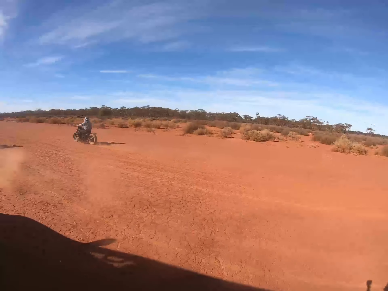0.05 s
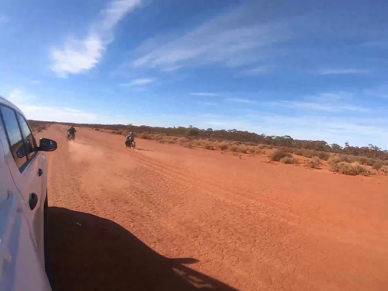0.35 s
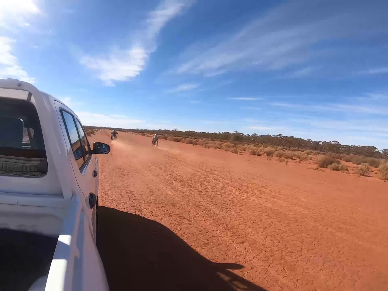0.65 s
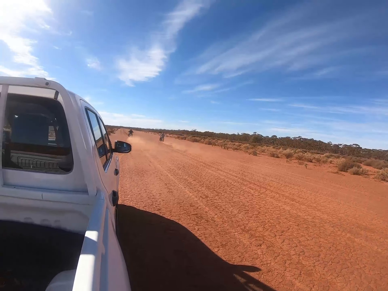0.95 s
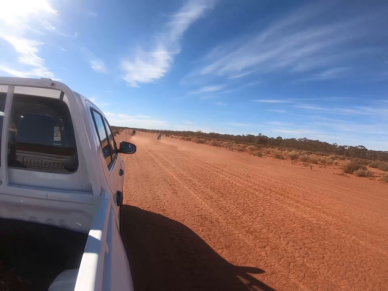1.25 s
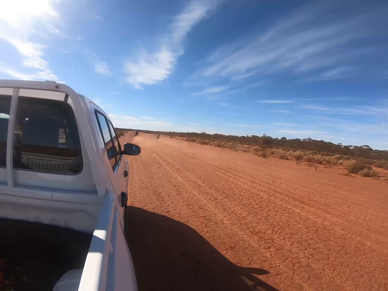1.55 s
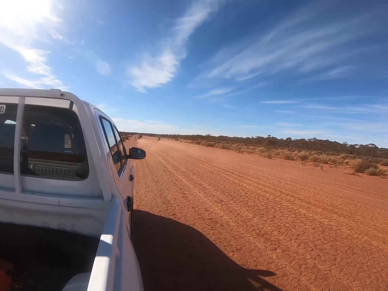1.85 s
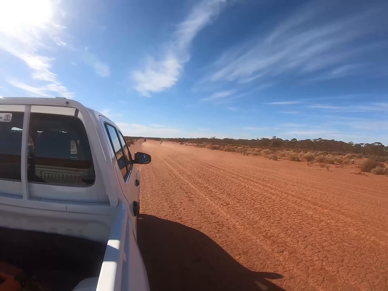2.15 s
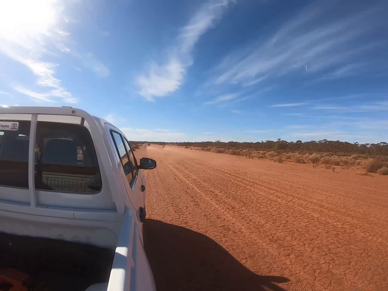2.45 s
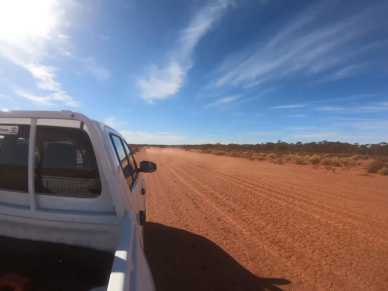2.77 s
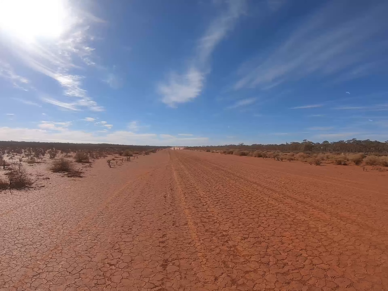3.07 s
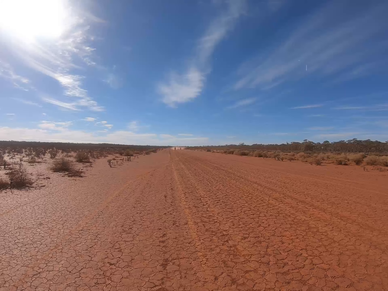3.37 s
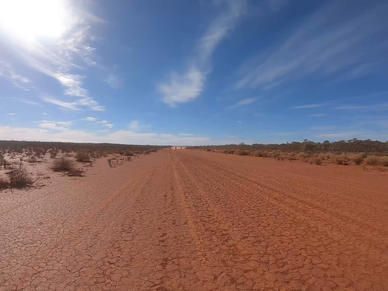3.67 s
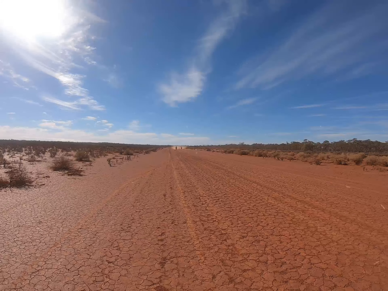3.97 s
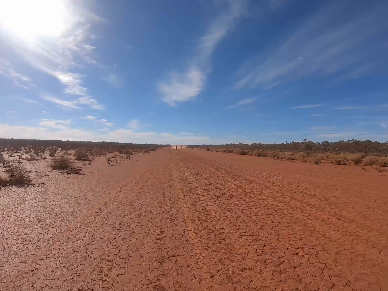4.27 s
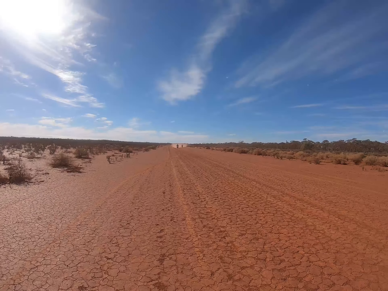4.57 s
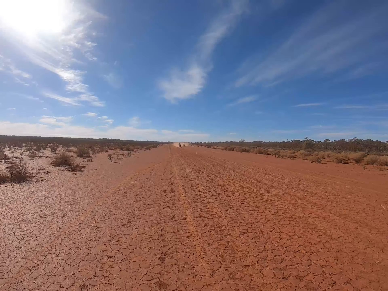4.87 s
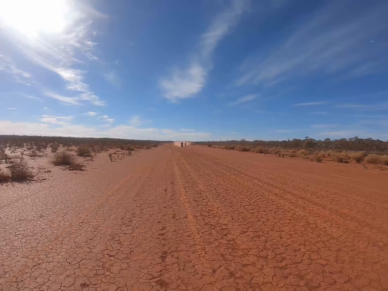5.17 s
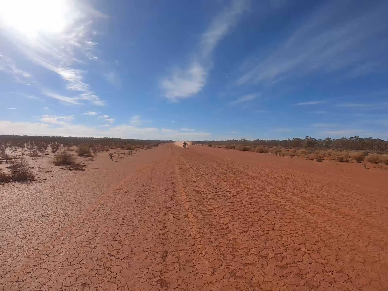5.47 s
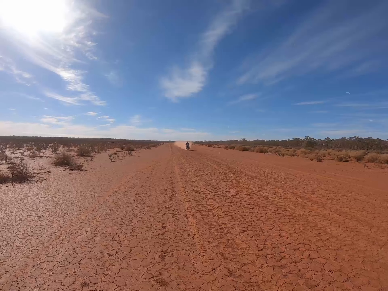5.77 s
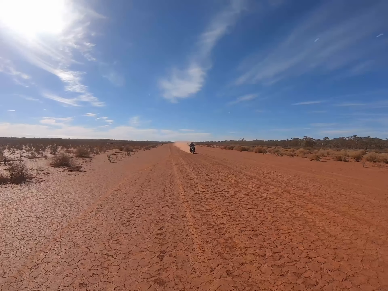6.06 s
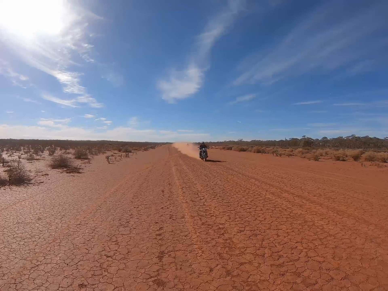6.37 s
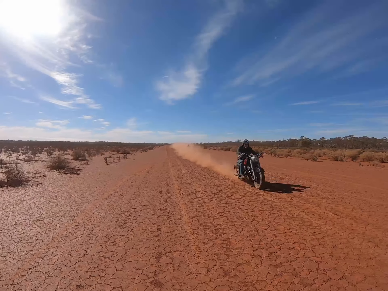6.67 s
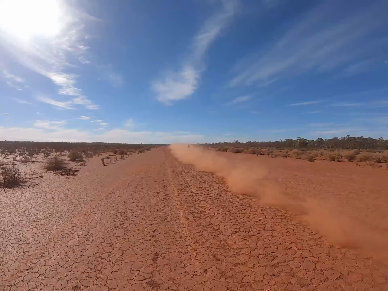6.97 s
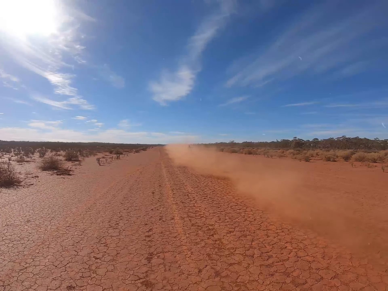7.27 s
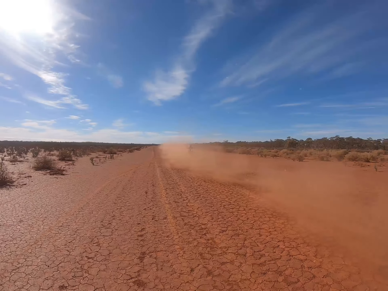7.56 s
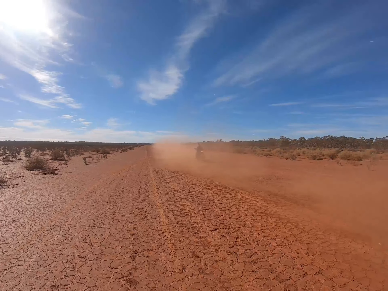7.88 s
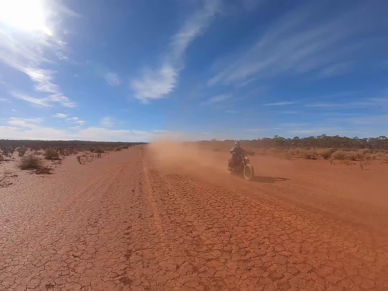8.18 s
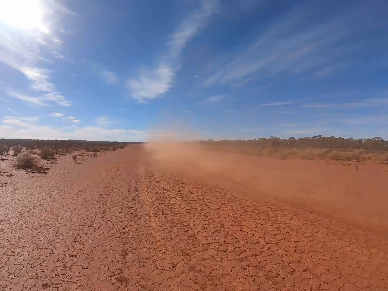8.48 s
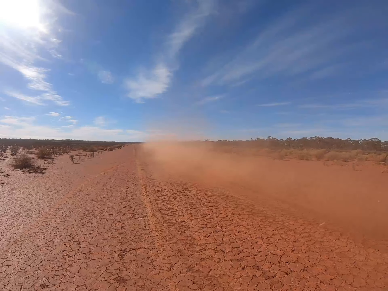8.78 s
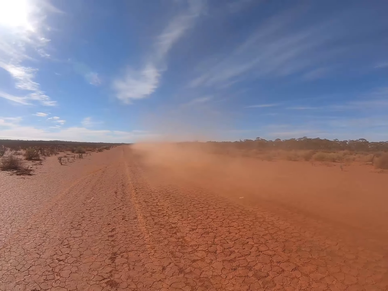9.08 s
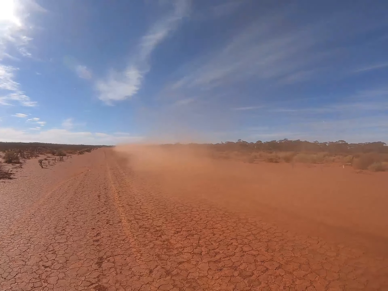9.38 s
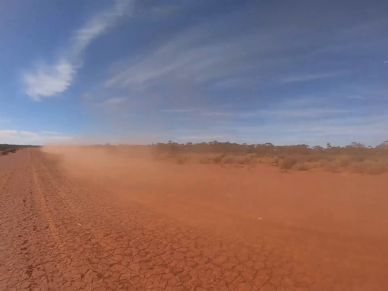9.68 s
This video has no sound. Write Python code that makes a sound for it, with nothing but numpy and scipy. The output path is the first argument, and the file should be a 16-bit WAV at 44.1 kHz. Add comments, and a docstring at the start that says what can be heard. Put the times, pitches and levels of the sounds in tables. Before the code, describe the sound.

Motorcycles drone away over open dirt, then two approach and thunder past one after the other, with light wind on the microphone.

```python
"""Two V-twin motorcycles on a dirt track

Open country, light wind on the microphone. Both machines ride away; the scene then switches: one
approaches, rolls off the throttle for a moment and passes, then the second passes on the right.
Each firing thumps through the exhaust and spits a burst of gas noise, over the hiss of tyres and
machinery. The passes reflect off the dirt and a parked truck."""
import sys
import numpy as np
from scipy import signal
from scipy.fft import rfft, irfft, next_fast_len
from scipy.io import wavfile
from scipy.ndimage import uniform_filter1d, map_coordinates

SR = 44100
rng = np.random.default_rng(int(sys.argv[2]) if len(sys.argv) > 2 else 0)


def unload_audio(sound):
    """Save the sound as a 16-bit wav file, at the path given as the first command line argument."""
    columns = np.transpose(np.atleast_2d(sound))
    # keep every value between -1 and 1, then stretch to whole-number steps
    steps = np.round(np.clip(columns, -1, 1) * 32767)
    wavfile.write(sys.argv[1], SR, steps.astype(np.int16))


N = 433503
TIME = np.arange(N) / SR
SWITCH_S = 3.07  # departure ends, approach begins
SOUND_M_S = 343
V_GAP_CYCLES = .4  # between the two firings

# First machine's rise and fall; rows thump, bark, rasp:
# (peak time [s], peak [dB], half-width [s], loss coming, loss going [dB per distance doubling])
FIRST_LEVEL = [(6.91, -12.5, 0.36, 7.36, 7.15), (6.815, -22, 0.38, 5.16, 13.1), (6.95, -26, 0.088, 3.49, 8)]


def amp(db):
    """Decibels to gain."""
    return 10 ** (np.asarray(db) / 20)


def unit(x):
    """Scale to rms 1."""
    return x / np.sqrt(np.mean(x ** 2) + 1e-20)


def along(points, hz):
    """Interpolate (frequency [Hz], value) points on a log axis."""
    knots_hz, values = np.transpose(points)
    return np.interp(np.log(hz + 1), np.log(knots_hz + 1), values)


def curves(rows, t=TIME):
    """Interpolate each column after the time column."""
    knots_s, *columns = np.transpose(rows)
    return [np.interp(t, knots_s, column) for column in columns]


def bumps(rows, t):
    """Summed bells (time [s], half-width [s], levels [dB] ...), one curve per level column."""
    return sum(np.outer(dbs, np.exp(-((t - at_s) / width_s) ** 2)) for at_s, width_s, *dbs in rows)


def wobble(rate_hz, t):
    """Smooth random curve, rate_hz knots a second."""
    coarse_s = t[::64]
    knots = rng.standard_normal(int(N * rate_hz / SR) + 4)
    return np.interp(t, coarse_s, map_coordinates(knots, [coarse_s * rate_hz]))


def filtered(x, response):
    """Apply a complex frequency response."""
    n = x.shape[-1]
    size = next_fast_len(n + 8192, True)
    return irfft(rfft(x, size) * response(np.fft.rfftfreq(size, 1 / SR)), size)[..., :n]


def band(x, low_hz, high_hz):
    """Steep causal band-pass."""
    return signal.sosfilt(signal.butter(4, [low_hz, high_hz], "band", fs=SR, output="sos"), x)


def low_share(hz, edge_hz):
    """Gain of a crossover's low side."""
    return 1 / (1 + (hz / edge_hz) ** 8)


def delayed(x, t, delay_s):
    """Varying delay on both channels."""
    return np.array([np.interp(t - delay_s, t, side) for side in x])


def two_ports(n, likeness=None):
    """White noise at both microphone ports, by default less alike in the treble."""
    # (frequency [Hz], left-right correlation)
    port_likeness = [(25, .96), (250, .99), (1000, .97), (4000, .86), (8000, .72), (12000, .5)]

    def mid_side_gains(hz):
        angle = np.arccos(np.clip(along(likeness or port_likeness, hz), -1, 1)) / 2
        return np.array([np.cos(angle), np.sin(angle)])

    mid, side = filtered(rng.standard_normal((2, n)), mid_side_gains)
    return np.array([mid + side, mid - side])


def blend(sounds, turn):
    """Cross-fade along a row of sounds (turn 0-1) at steady loudness."""
    place = turn * (len(sounds) - 1)
    mixed = sum(np.maximum(1 - np.abs(place - i), 0) * unit(x) for i, x in enumerate(sounds))
    power = np.atleast_2d(mixed ** 2).mean(0)
    return mixed / np.sqrt(np.abs(uniform_filter1d(power, size=9000)) + 1e-9)


def loudness_db(level, t):
    """Thump, bark and rasp fall with each doubling of distance; they swell and sag across the plain."""
    # (time [s], half-width [s], thump [dB], bark [dB], rasp [dB])
    swells = [(.93, 0.053, 1.5, -4, 2.5), (1.15, 0.075, -1.5, 4.5, -1), (1.65, 0.37, -0.5, 1.5, -2),
              (2.15, 0.23, 3.5, 4.5, 2), (2.97, 0.12, 4, 6.5, 2.5), (3.25, 0.17, 0.5, 2.5, -0.5),
              (4.35, 0.25, -3, 0, -3), (5.08, 0.37, 5.5, 7, 1.5), (5.46, 0.12, -7.5, -3.5, -0.5),
              (5.87, 0.4, 5.5, 5, 1), (8.85, .17, -3, 3.5, 1), (9.2, 0.21, -2.5, 0.5, 5)]
    rides_db = [db - np.where(t < at_s, coming, going) * np.log2(np.hypot(1, (t - at_s) / width_s))
                for at_s, db, width_s, coming, going in level]
    return np.array(rides_db) + bumps(swells, t)


def firings(cycle, gap_cycles, front_db, scatter_db, jitter_s=.00003):
    """Two unevenly spaced pulses a cycle, each slightly off in size and time."""
    pulses = np.zeros(len(cycle))
    for offset, db in [(-gap_cycles / 2, front_db), (gap_cycles / 2, 0)]:
        at = np.flatnonzero(np.diff(np.floor(cycle - offset)) > 0)
        lateness, size = np.clip(rng.standard_normal((400, 2))[:len(at)], -1.5, 1.5).T
        at = np.clip(at + np.round(jitter_s * SR * lateness).astype(int), 0, len(cycle) - 1)
        pulses[at] = amp(db + scatter_db * size)
    return pulses


def gas_flow(pulses, steady, burst_s, spit_db):
    """Noise envelope: a brief gas jet per firing, steady tyre and valve-gear hiss in between."""
    age_s = np.arange(SR // 40) / SR
    spits = pulses ** 2 * amp(spit_db * rng.uniform(-0.41, 1, len(pulses)))
    burst = np.exp(-age_s / burst_s) * (1 - np.exp(-age_s / 0.00064))
    jet = signal.fftconvolve(spits, burst)[:len(pulses)]
    return np.sqrt((1 - steady) * unit(jet) ** 2 + steady)


def patchy(x, depth_db):
    """Shifting resonances colour each spit of gas differently."""
    spectra = signal.stft(x, nperseg=512)[2]
    field = uniform_filter1d(rng.standard_normal(spectra.shape[1:]), size=4, axis=0)
    field = uniform_filter1d(field, size=14, axis=1)
    return signal.istft(spectra * amp(depth_db * unit(field)), nperseg=512)[1][:, :x.shape[1]]


def dispersed(x, pipe_hz=290, radius=0.98):
    """All-pass: waves run back and forth in the pipe, so a pulse leaves as a short ringing train."""
    poles = [1, -2 * radius * np.cos(2 * np.pi * pipe_hz / SR), radius ** 2]
    return signal.lfilter(poles[::-1], poles, x)


def pipe_ringing(x, colours, size=8192):
    """The exhaust rings after each pulse: one sound per colour and per angle halfway between."""
    hz = np.fft.rfftfreq(size, 1 / SR)
    db = np.repeat([along([*colour, (9000, -120)], hz) for colour in colours], 2, axis=0)
    cepstrum = irfft(np.log(amp((db[1:] + db[:-1]) / 2)))
    cepstrum[:, 1:size // 2] *= 2  # fold to minimum phase
    cepstrum[:, size // 2 + 1:] = 0
    impulses = irfft(np.exp(rfft(cepstrum)))
    return signal.oaconvolve(x[None], impulses, axes=1)[:, :len(x)]


def mouth_ring(pulses, mouth_hz=2950, log_spread=.14, decay_s=.003):
    """Each firing briefly rings the pipe mouth at a random pitch and strength."""
    age_s = np.arange(SR // 40) / SR
    ring = np.zeros(len(pulses) + SR)
    for at in np.flatnonzero(pulses):
        detune, size = rng.standard_normal(2)
        tone = np.sin(2 * np.pi * mouth_hz * np.exp(log_spread * detune) * age_s)
        ring[at:at + len(age_s)] += pulses[at] * size * np.exp(-age_s / decay_s) * tone
    return unit(band(ring[:len(pulses)], 1500, 6000))


def motorcycle(t, cycle, level, pose, gap_cycles, pipes, gas, front_db, scatter_db, burst_s, spit_db,
               thump_db, bark_db, rasp_db, ring_db, throttle=1, turbulence_db=-24, bark_noise=.1):
    """One V-twin: low exhaust thump, partly noisy midrange bark, rasp of escaping gas."""
    thump_gain, bark_gain, rasp_gain = amp(loudness_db(level, t))
    turn, steady = np.clip(curves(pose, t), 0, 1)
    pulses = firings(cycle, gap_cycles, front_db, scatter_db)
    flow = gas_flow(pulses, steady, burst_s, spit_db)
    hiss = flow * patchy(two_ports(len(t)), depth_db=2)
    noises = [filtered(hiss, lambda hz: amp(along(colour, hz))) for colour in gas]
    drive = unit(dispersed(pulses)) + amp(turbulence_db) * flow * rng.standard_normal(len(t))
    tones = pipe_ringing(drive, pipes)
    lows = filtered(tones, lambda hz: low_share(hz, 314.5))
    body = blend(lows, turn)
    edge = blend(tones - lows, turn)
    grit = blend([band(x, 442, 1113) for x in noises], turn)
    fizz = blend([band(x, 1640, 14000) for x in noises], turn) + amp(ring_db) * mouth_ring(pulses)
    # A shut throttle softens the pulses and cuts the noise to its steady share.
    blast = steady + (1 - steady) * throttle ** 4
    bark = np.sqrt(1 - bark_noise) * throttle * edge + np.sqrt(bark_noise) * blast * grit
    return (amp(thump_db) * thump_gain * throttle * body
            + amp(rasp_db) * rasp_gain * blast * fizz
            + amp(bark_db) * bark_gain * bark)


def riding_away():
    """The departing pair merges into one steady, loping drone."""
    # Engine speed, Doppler included: (time [s], rate [cycles/s])
    revs = [(0, 22.11), (.5, 22.15), (1, 22.26), (1.6, 22.47), (2.3, 22.5), (3.07, 22.42)]
    # Rise and fall, laid out as FIRST_LEVEL
    level = [(.05, -17, 0.35, 8, 4.3), (.05, -34, 0.42, 1, 4.38), (.45, -42, .6, 7, 5.5)]
    # (time [s], pipes turned to the listener [0-1], steady noise share [0-1])
    pose = [(0, 0.2, 0.16), (.6, 0.21, 0.07), (1.501, 0.44, 0.19), (2.199, .55, 0.29), (2.6, 0.99, 0.73)]
    # Exhaust and gas-noise spectra, one per angle: (frequency [Hz], level [dB])
    pipes = [
        [(25, -18.5), (60, -11.5), (90, -3.5), (130, 20), (175, 0.5), (220, 6), (270, -2.5), (400, -19),
         (560, -16.5), (720, -14.5), (830, -12.5), (1250, -44.5), (1600, -35), (3500, -75.5)],
        [(25, -17), (60, -16), (125, 11), (178, -1.5), (225, -6), (268, 6.5), (335, -6.5), (400, -9),
         (505, -18), (560, -12), (700, -33.5), (1100, -37), (3500, -76)],
        [(25, -18.5), (130, 5), (180, -8), (225, 3.5), (270, 3), (340, -16), (400, -14.5), (490, -25),
         (600, -20.5), (720, -41), (790, -29.5), (1100, -29), (3500, -83)],
    ]
    gas = [
        [(500, 1), (900, -1), (1250, -9), (1700, -12), (2400, -16), (2850, -10.5), (3300, -14), (4200, -17.5),
         (4600, -17), (5400, -24.5), (5950, -26), (6300, -29), (8200, -36.5), (10000, -43.5), (15000, -60)],
        [(500, 0.5), (900, -1.5), (1250, -5), (1700, -9), (2400, -20), (3200, -27.5), (4500, -22.5),
         (6000, -39), (8200, -46), (10000, -61), (15000, -71)],
    ]
    t = TIME[TIME < SWITCH_S]
    cycle = np.cumsum(curves(revs, t)[0]) / SR - .975
    bike = motorcycle(t, cycle, level, pose, V_GAP_CYCLES, pipes, gas,
                      front_db=-3.0, scatter_db=1.0, burst_s=0.003, spit_db=5.0,
                      thump_db=-2.0, bark_db=3.0, rasp_db=1.5, ring_db=-8)
    return np.pad(bike, [(0, 0), (0, N - len(t))])


def wind(breeze_db=-29, lumps_db=2.0, likeness=0.83):
    """Breeze and gusts rumble on the microphone housing, nearly alike on both sides."""
    # Buffeting spectrum: (frequency [Hz], level [dB])
    buffet = [(20, -17), (55, -3), (95, -5), (180, -6), (350, -20), (700, -35), (3000, -81.5)]
    # (time [s], half-width [s], rise over the breeze [dB])
    gusts = [(1.6, 0.076, 4), (2.28, .14, 8), (3.3, 0.22, 4), (4.2, 0.58, 3.5), (5.33, 0.29, 9)]
    rumble = unit(filtered(two_ports(N, [(50, likeness)]), lambda hz: amp(along(buffet, hz))))
    return amp(breeze_db + bumps(gusts, TIME) + lumps_db * wobble(12, TIME)) * rumble


def cracks(crack_db=-5, decay_s=0.003):
    """Bright snaps of gas: now and then the departing pair cracks harder."""
    # (time [s], relative peak [dB])
    snaps = [(0.396, -36), (0.506, -40.5), (0.9112, -25), (1.295, -33)]
    t = TIME[TIME < SWITCH_S]
    envelope = sum(amp(db) * (t >= at_s) * np.exp(-np.abs(t - at_s) / decay_s) for at_s, db in snaps)
    noise = band(two_ports(len(t)), 2500, 12000)
    gas = unit(filtered(noise, lambda hz: 1 / (1 + (hz / 5000) ** 2)))
    return np.pad(amp(crack_db) * envelope * gas, [(0, 0), (0, N - len(t))])


def travel(path, t):
    """Range [m] and Doppler factor along a straight run."""
    closest_s, miss_m, speed_m_s = path
    past_m = speed_m_s * (t - closest_s)
    range_m = np.hypot(miss_m, past_m)
    return range_m, 1 / (1 + speed_m_s * past_m / range_m / SOUND_M_S)


def cycles(revs, path, t):
    """Engine cycles counted at the listener, Doppler included."""
    return np.cumsum(curves(revs, t)[0] * travel(path, t)[1]) / SR


def outdoors(x, t, path, height_product_m2, ground_gain, mirror_m=3.25, echo_hz=1500, air_db_per_m=0.1):
    """Air loss, ground bounce and the truck's echo; their changing delays sweep the colour."""
    # Strongest echo: (distance past the listener [m], half-width [m], gain)
    truck_echo = (8, 7, .62)
    peak_m, spread_m, peak_gain = truck_echo
    closest_s, miss_m, speed_m_s = path
    past_m = speed_m_s * (t - closest_s)
    range_m = travel(path, t)[0]
    bounce_s = 2 * height_product_m2 / range_m / SOUND_M_S
    echo_s = (np.hypot(miss_m + mirror_m, past_m) - range_m) / SOUND_M_S
    bounce_gain = ground_gain * np.sqrt(miss_m / range_m)
    echo_gain = peak_gain * np.exp(-((past_m - peak_m) / spread_m) ** 2)
    treble = filtered(x, lambda hz: 1 - low_share(hz, 9000))
    direct = x - (1 - amp(-air_db_per_m * range_m)) * treble
    # Deep bass bends round the truck without an echo.
    echo = filtered(direct, lambda hz: (1 - low_share(hz, 185)) / np.hypot(1, hz / echo_hz))
    heard = direct + bounce_gain * delayed(direct, t, bounce_s) + echo_gain * delayed(echo, t, echo_s)
    return heard / np.sqrt(1 + bounce_gain + bounce_gain ** 2 + echo_gain ** 2)


def first_pass():
    """A long accelerating approach, a hum during the upshift, then the machine thunders by."""
    # (closest time [s], distance [m], speed [m/s])
    path = (6.95, 3.31, 31.45)
    # Engine speed: (time [s], rate [cycles/s])
    revs = [(3.07, 28.64), (4.4, 30.884), (6.05, 33.42), (6.35, 26.86), (6.8, 27.48), (7.7, 27.9)]
    # (time [s], throttle opening [0-1])
    opening = [(6.02, 1), (6.08, .42), (6.27, .42), (6.33, 1)]
    # Firing gap, shifting as the two pipes swing past: (time [s], gap [cycles])
    gap = [(6.02, .518), (6.35, .54), (6.75, .55), (7.05, .6)]
    # (time [s], pipes turned to the listener [0-1], steady noise share [0-1])
    pose = [(3.35, 0.13, 0.84), (3.7, 0.052, 0.77), (6.02, 0.37, 0.93), (6.35, 0.57, 0.57),
            (6.8, .69, 0.35), (7.1, 0.97, .16), (7.7, 0.98, .19)]
    # Exhaust and gas-noise spectra, one per angle: (frequency [Hz], level [dB])
    pipes = [
        [(25, -8), (200, 5), (330, 5.5), (420, -4.5), (560, -12.5), (740, -2), (820, -15.5), (950, -8.5),
         (1130, -10.5), (1350, -22.5), (3200, -32), (5000, -67.5)],
        [(25, -9), (70, 0), (140, 0), (220, -1), (300, 10.5), (365, 5.5), (440, -1), (600, -5.5), (830, -20),
         (930, -14), (1200, -16.5), (1300, -32), (1420, -20), (1700, -30.5), (3200, -35), (5000, -70)],
        [(25, -11.5), (60, 2.5), (110, 1.5), (155, 16), (230, 2.5), (300, 10), (390, 5.5), (510, -8), (640, -5),
         (800, -13.5), (960, -12), (1150, -21), (1600, -21.5), (3500, -60)],
        [(25, -28), (60, -11.5), (95, -3), (130, 3.5), (165, -8.5), (205, -1.5), (260, -7), (390, -14.5),
         (520, -25.5), (750, -37), (1100, -32), (1600, -42.5), (3500, -69.5)],
    ]
    gas = [
        [(500, -0.5), (1250, -5), (1900, -15), (2400, -23), (3200, -17), (4500, -27.5), (6000, -44.5),
         (15000, -105)],
        [(500, 9), (900, -3.5), (1250, -1.5), (1700, -17.5), (2400, -23.5), (3200, -22), (4500, -27.5),
         (6000, -49), (8200, -59.5), (10000, -80), (15000, -95)],
        [(500, -2), (900, -11.5), (1250, -1.5), (1700, -13), (2400, -19), (3200, -18.5), (4500, -26.5),
         (6000, -39), (8200, -39), (10000, -50), (15000, -58)],
        [(500, -0.5), (900, -2.5), (1250, -5), (1700, -12.5), (2400, -17.5), (3200, -25), (4500, -27),
         (6000, -34.5), (8200, -29.5), (10000, -44.5), (15000, -52)],
    ]
    t = TIME[TIME >= SWITCH_S]
    cycle = cycles(revs, path, t) - .606
    throttle = curves(opening, t)[0]
    bike = motorcycle(t, cycle, FIRST_LEVEL, pose, curves(gap, t)[0], pipes, gas,
                      front_db=1.2, scatter_db=1.16, burst_s=0.0031, spit_db=1.5,
                      thump_db=0.6, bark_db=2.5, rasp_db=1.5, ring_db=-18.5, throttle=throttle)
    bike += overrun(t, cycle, throttle)
    bike = outdoors(bike, t, path, height_product_m2=0.77, ground_gain=0.07)
    return np.pad(bike + gear_whine(t, cycle) + snarl(t, cycle), [(0, 0), (N - len(t), 0)])


def gear_whine(t, cycle, teeth_per_cycle=90, whine_db=-13):
    """Meshing teeth sing a thin tone that climbs with the revs while the gear is loaded."""
    tone = np.sin(2 * np.pi * teeth_per_cycle * cycle + .8 * wobble(25, t))
    loaded = np.interp(t, [5.98, 6.08], [1, 0])
    rasp_db = loudness_db(FIRST_LEVEL, t)[2]
    return amp(rasp_db + whine_db + 2.0 * wobble(10, t)) * loaded * unit(tone)


def snarl(t, cycle):
    """High engine harmonics sing out under load, climbing until the upshift."""
    tones = sum(amp(4 * wobble(9, t))
                * np.sin(2 * np.pi * (harmonic * cycle + rng.random()) + .5 * wobble(20, t))
                for harmonic in (25, 27, 29, 31, 33, 39))
    return amp(np.interp(t, [SWITCH_S, 5.95, 6.2], [-48, -41, -75])) * unit(tones)


def running_gear(ring_hz=3270, width_hz=170):
    """Drive-casing ring and tyre hiss on dirt grow as the first machine nears."""
    # (time [s], ring [dB], hiss [dB])
    levels = [(3.1, -74.5, -80), (4.3, -65, -75.5), (4.8, -44, -61), (5.4, -56.5, -61.5), (5.9, -41, -53.5),
              (6.5, -56.5, -63), (7, -66.5, -65), (7.5, -88, -83)]
    ring_db, hiss_db = curves(levels)
    noise = two_ports(N)
    ring = unit(filtered(noise, lambda hz: 1 / (1 + ((hz - ring_hz) / width_hz) ** 2)))
    hiss = unit(band(noise, 3700, 8700))
    return filtered(amp(ring_db) * ring + amp(hiss_db) * hiss, lambda hz: low_share(hz, 9000))


def far_drone(drone_db=-34):
    """Only the second machine's deepest exhaust tones carry across the plain from afar."""
    # (multiple of the cycle rate, level [dB])
    harmonics = [(4, -5), (5, 0), (6, -3)]
    cycle = np.cumsum(np.interp(TIME, [3.3, 3.9, 5.8], [32, 33.4, 33])) / SR
    tones = sum(amp(db + 2 * wobble(6, TIME)) * np.sin(2 * np.pi * k * cycle + .4 * wobble(9, TIME))
                for k, db in harmonics)
    fade = np.interp(TIME, [SWITCH_S, 3.1, 4.2, 5.5, 7.5], [0, .6, 1, .6, 0])
    return amp(drone_db) * fade * unit(tones)


def overrun(t, cycle, throttle, hum_db=2.5):
    """As the throttle shuts, clean exhaust tones take over from the thump."""
    # (multiple of the cycle rate, level [dB])
    harmonics = [(2, -19), (4, -2), (8, -14), (10, -2), (11, -17), (12, -16), (18, -17), (19, -24)]
    hum = sum(amp(db + 1.3 * wobble(25, t)) * np.sin(2 * np.pi * k * cycle + .15 * wobble(30, t))
              for k, db in harmonics)
    shut = (1 - throttle) / (1 - throttle.min() + 1e-6)
    thump_db = loudness_db(FIRST_LEVEL, t)[0]
    return amp(thump_db + hum_db) * shut * unit(hum)


def second_pass():
    """The second machine passes, crackles sharply as it leaves, then rolls off the throttle."""
    # (closest time [s], distance [m], speed [m/s])
    path = (8.564, 2.41, 22.68)
    # Engine speed: (time [s], rate [cycles/s])
    revs = [(7.4, 30.896), (8.2, 31.352), (8.9, 31.334), (9.83, 31.721)]
    # (time [s], throttle opening [0-1])
    opening = [(9.64, 0.93), (9.71, 0.16), (9.8, 0.39)]
    # Rise and fall, laid out as FIRST_LEVEL
    level = [(8.485, -9.5, 0.31, 10.1, 5.76), (8.412, -23.5, 0.62, 32.2, 12.6),
             (8.39, -29.5, 0.3, 19.9, 6.05)]
    # (time [s], pipes turned to the listener [0-1], steady noise share [0-1])
    pose = [(8.001, .13, 0.46), (8.349, .12, .35), (8.6, 0.49, 0.32), (8.901, 0.77, .15),
            (9.149, 0.84, .053), (9.6, 0.84, 0.1)]
    # Exhaust and gas-noise spectra, one per angle: (frequency [Hz], level [dB])
    pipes = [
        [(25, -9), (95, 2), (125, -11), (170, 8), (230, 7.5), (280, -3.5), (390, -8), (520, -16.5), (750, -12),
         (950, -23.5), (1200, -35.5), (1600, -32.5), (3500, -72)],
        [(25, -21), (90, 0), (150, 2.5), (215, 5), (300, -0.5), (370, -1.5), (460, -4), (540, -7.5),
         (660, -14.5), (850, -26.5), (1100, -36), (1600, -32), (3500, -75)],
        [(25, -26.5), (60, 2), (110, 6), (150, 8), (215, 1.5), (300, -4.5), (390, -15.5), (520, -14.5),
         (750, -17), (1100, -33), (1600, -35.5), (3500, -76.5)],
    ]
    gas = [
        [(500, -14), (900, -9), (1250, -6.5), (1700, -7.5), (2400, -16), (3200, -11.5), (4500, -21),
         (6000, -37.5), (8200, -46.5), (10000, -55), (15000, -64)],
        [(500, 7), (900, -11.5), (1250, -14), (1700, -18), (2400, -19), (3200, -24), (4500, -27.5),
         (6000, -30.5), (8200, -32), (10000, -40), (15000, -53.5)],
        [(500, 2), (900, -0.5), (1250, -11), (1700, -34), (2400, -26.5), (3200, -29), (4500, -33),
         (6000, -32.5), (8200, -36.5), (10000, -50), (15000, -65.5)],
    ]
    t = TIME[TIME >= 7]
    cycle = cycles(revs, path, t) - .735
    bike = motorcycle(t, cycle, level, pose, V_GAP_CYCLES, pipes, gas,
                      front_db=-3.0, scatter_db=0.5, burst_s=0.0018, spit_db=8.0,
                      thump_db=0.0, bark_db=3.5, rasp_db=0, ring_db=-9, throttle=curves(opening, t)[0])
    bike = beamed(pipe_return(bike, t, path), t)
    bike = outdoors(bike, t, path, height_product_m2=0.52, ground_gain=0.13)
    return np.pad(bike, [(0, 0), (N - len(t), 0)])


def pipe_return(x, t, path, trip_s=.0059, gain=0.32, dull_hz=1100):
    """Each pulse comes back once, duller, after a round trip of the pipe."""
    dull = filtered(x, lambda hz: low_share(hz, dull_hz))
    doppler = travel(path, t)[1]
    return x + gain * (delayed(dull, t, trip_s / doppler) - .5 * dull)


def beamed(x, t, edge_hz=5000):
    """The pipe mouths beam their treble: brighter while they point at the listener."""
    # (time [s], half-width [s], treble boost [dB])
    beam = [(9.3, 0.26, 7)]
    treble = x - filtered(x, lambda hz: low_share(hz, edge_hz))
    return x + (amp(bumps(beam, t)) - 1) * treble


def from_right(x):
    """Sound from the right reaches the two ports with different level and phase."""
    # (frequency [Hz], left minus right [dB])
    tilt = [(400, -0.5), (1100, -6.5), (2800, -4), (4600, -6.5), (12000, -1)]
    # (frequency [Hz], left lag [rad])
    lag = [(200, 0), (700, 0.32), (1400, 0.82), (3200, 0.4), (8000, 2)]
    sides = np.array([[.5], [-.5]])
    return filtered(x, lambda hz: amp(sides * along(tilt, hz)) * np.exp(-1j * sides * along(lag, hz)))


def scene():
    """Departure, two passes and wind; the stereo image closes to mono for a while and reopens."""
    # (time [s], stereo width [0-1])
    width = [(0, .5), (.5, 1), (1.75, 1), (2, .45), (2.5, .25), (2.65, 0), (8, 0), (8.5, 1)]
    second = from_right(second_pass())
    switch_dip = np.minimum(np.abs(TIME - SWITCH_S) / .002, 1)
    rides = switch_dip * (riding_away() + first_pass())
    mix = rides + cracks() + running_gear() + far_drone() + second + wind()
    middle = mix.mean(0)
    return middle + curves(width)[0] * (mix - middle)


def record(dry, ceiling=.9, low_hz=8, top_hz=15800):
    """Soft peak limiting, then a band limit."""
    rounded = dry / (1 + np.abs(dry / ceiling) ** 6) ** (1 / 6)
    return filtered(rounded, lambda hz: (hz > low_hz) * (hz < top_hz))


dry = scene()
out = record(dry)
unload_audio(out)
```